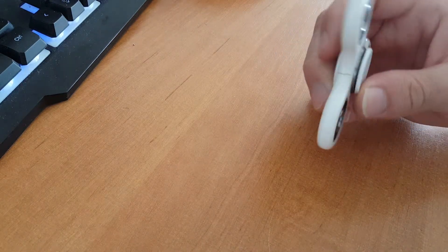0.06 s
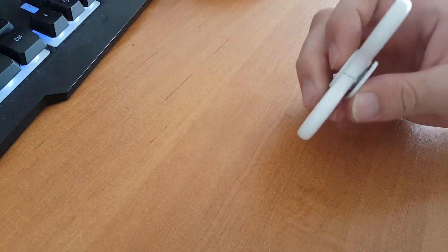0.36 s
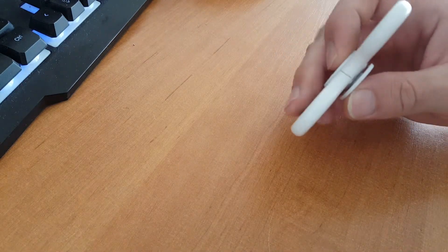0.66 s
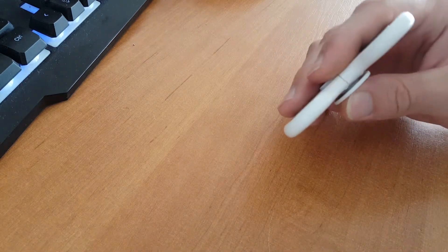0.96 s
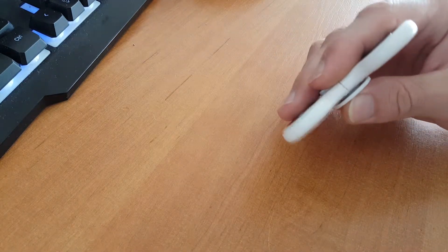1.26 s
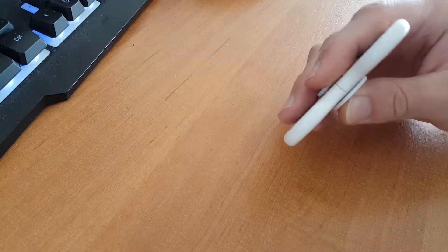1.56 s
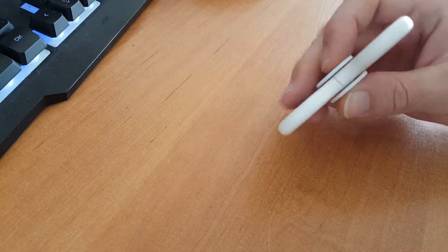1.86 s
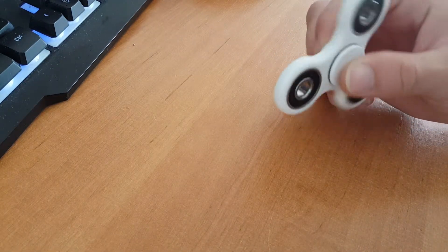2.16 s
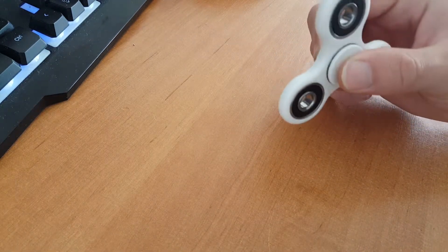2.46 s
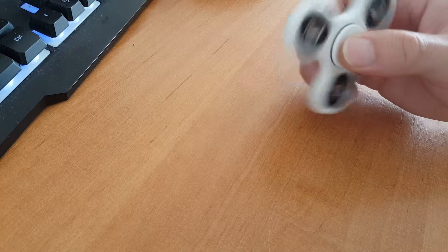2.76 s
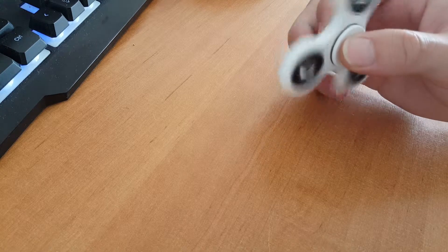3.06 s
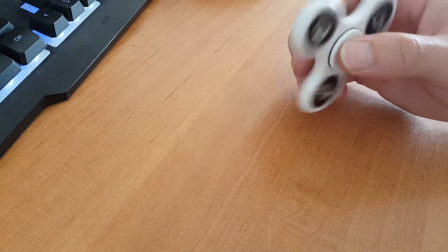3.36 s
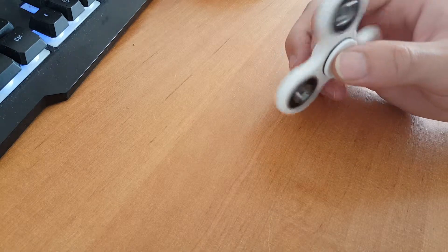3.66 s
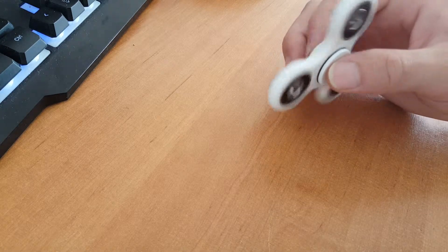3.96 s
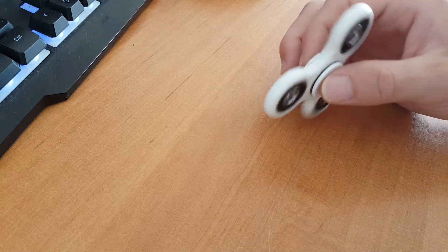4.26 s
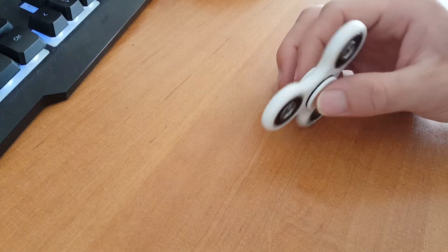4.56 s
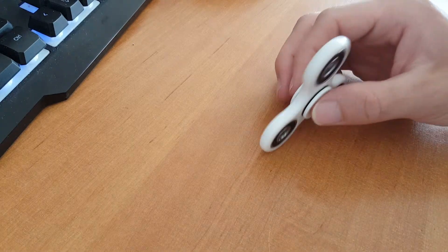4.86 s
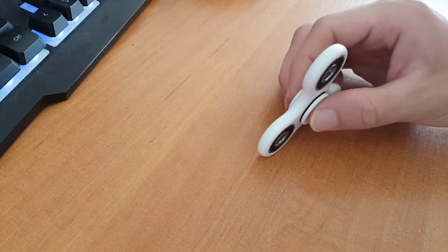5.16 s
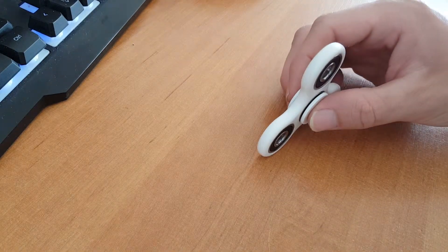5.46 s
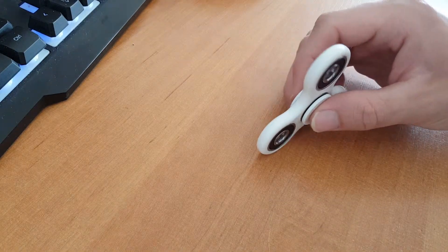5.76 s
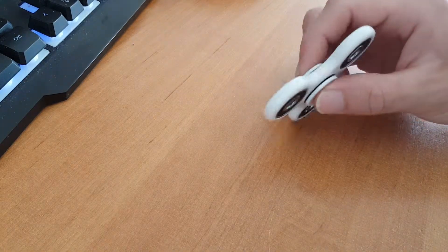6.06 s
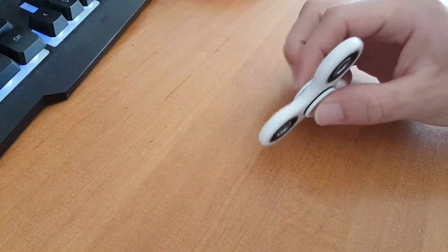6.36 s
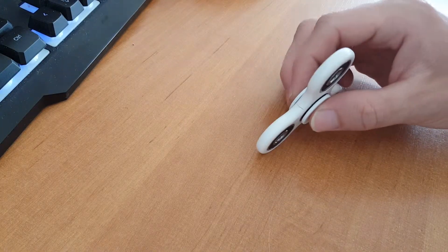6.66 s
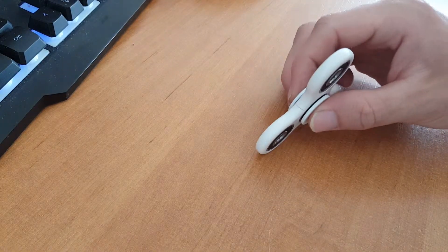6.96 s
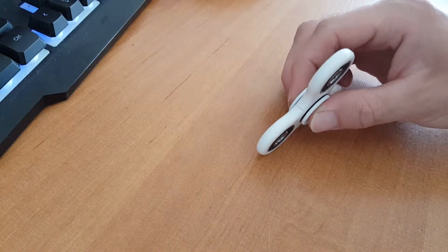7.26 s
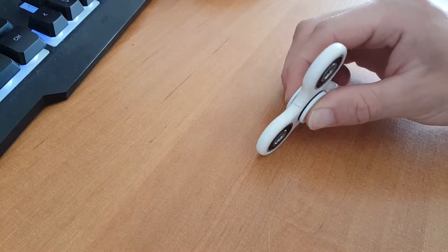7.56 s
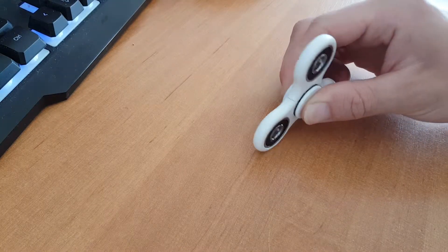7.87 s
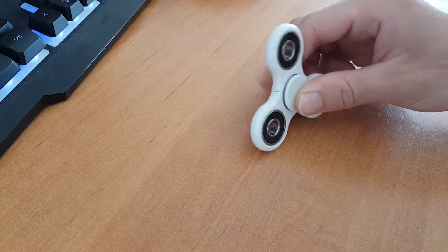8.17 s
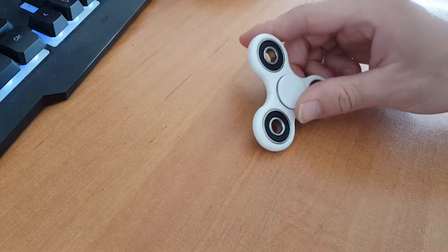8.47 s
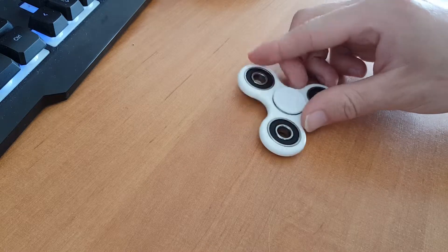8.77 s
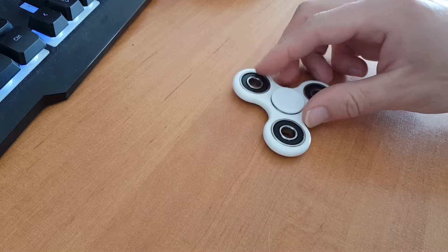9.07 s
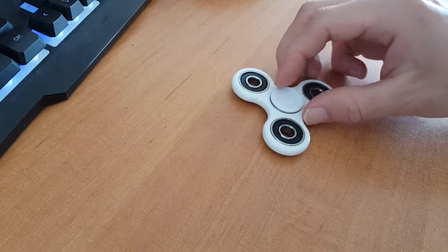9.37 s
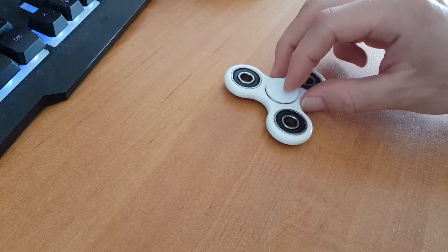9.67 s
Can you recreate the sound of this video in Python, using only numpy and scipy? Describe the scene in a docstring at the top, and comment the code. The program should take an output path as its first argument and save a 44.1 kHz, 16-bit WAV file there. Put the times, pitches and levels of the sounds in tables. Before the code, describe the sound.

A small plastic spinner clicks lightly in the hand, then knocks against a wooden desk with a slight rattle, close by.

```python
"""Fingernails tick on a plastic fidget spinner as it is turned in the hand, close by in a quiet, humming room.
It is then knocked and rolled on a wooden desk, and at last pushed along flat in short jerks.
Each impact excites the damped modes of the desk top and rattles the loose bearings in the shell.
Rolling and sliding are friction noise, coloured by the same two bodies; the room adds a diffuse echo."""
import sys
import numpy as np
from scipy import signal
from scipy.fft import rfft, irfft
from scipy.io import wavfile

SR = 44100
rng = np.random.default_rng(int(sys.argv[2]) if len(sys.argv) > 2 else 0)


def unload_wav(signal):
    """Save mono or channel-first audio to the path in sys.argv[1] as 16-bit WAV at rate SR, clipped to [-1, 1]."""
    wavfile.write(
        sys.argv[1],
        SR,
        np.round(np.clip(np.atleast_2d(signal).T, -1, 1) * 32767).astype(np.int16),
    )


N = 432621
TIME = np.arange(N) / SR

# Impacts on the desk: t/s, relative force/dB, contact cut-off/Hz, relative rattle/dB, bounce delay/s
IMPACTS = [(4.6460, -6, 1310, -21, 0.015), (4.9426, -3.5, 1370, -22, 0.02),
           (4.9953, -1.5, 1860, -14.5, 0.017), (5.797, -28, 950, -58, 0.0017),
           (5.814, -27.5, 1397, -46.5, 0), (5.82, -24, 160, -68, 0), (6.048, -17, 440, -54, 0.0004),
           (6.1748, -11.5, 890, -39.5, 0), (6.308, -31, 1100, -58, 0.00059),
           (6.4875, -5, 2020, -22.5, 0.00027), (6.5724, -5, 1681, -25.5, 0.018),
           (7.441, -49.5, 3494, -55, 0), (7.481, -47, 4507, -47, 0), (7.896, -43, 2700, -48.5, 0.0027),
           (8.1224, -32, 756, -62.5, 0), (8.5795, -20.5, 1996, -30, 0.012), (8.7809, -28, 2170, -37, 0),
           (8.7833, -7, 184.3, -34, 0.0017), (8.7899, -19, 396, -25, 0), (8.933, -36, 700, -50, 0.0019)]
# Nails and cap on the shell: t/s, relative level/dB, centre f/Hz, decay time/s
SHELL_TICKS = [(0.762, -34, 1850, .023), (1.022, -15.5, 6700, 0.0016), (1.335, -31.5, 9000, 0.0043),
               (1.337, -31.5, 3520, .006), (1.345, -31.5, 8500, .008), (1.365, -41, 9500, .0025),
               (2.026, -46.5, 6540, .002), (2.171, -39, 9500, 0.0027), (2.18, -37, 5200, .002),
               (2.648, -40.5, 7350, .0031), (2.744, -41, 5000, .005), (2.754, -36, 8200, 0.0053),
               (2.763, -31.5, 1930, 0.019), (3.566, -48, 7000, .0015), (3.915, -43, 8500, .004),
               (6.105, -42, 4100, .0017), (6.115, -41, 4100, 0.0036), (8.219, -46.5, 6100, .003),
               (9.652, -37, 7500, 0.0041)]
# Rim rolling over the wood grain: start t/s, duration/s, rumble level/dB, relative rasp/dB
RIM_ROLLS = [(5.794, 0.12, -44.5, -73), (5.916, 0.059, -36, -58.5), (5.985, 0.062, -34, -52.5),
             (6.205, .135, -41.5, -64), (8.11, 0.023, -44.5, -62), (8.237, 0.047, -40.5, -57.5),
             (8.419, .05, -57.5, -69), (8.68, .11, -55, -65)]
# Jerks of the flat spinner: t/s at top speed, scrape level/dB, desk shudder level/dB
SLIDE_JERKS = [(9.572, -56.5, -51.5), (9.668, -57.5, -57), (9.757, -71, -51), (9.805, -66, -54)]
# Modes of the desk top: f/Hz, T60/s, left level/dB, right level/dB
DESK_MODES = [(128, .42, -25, -25.5), (133.63, 0.6, -20.5, -21), (205.1, 0.19, -31, -36.5),
              (217.4, 0.33, -28.5, -31), (280, 0.14, -26.5, -21), (304.5, .45, -25.5, -25.5),
              (382.9, .15, -16.5, -13), (436.5, 0.082, -21.5, -21), (493.3, 0.12, -25, -17.5),
              (565.2, .06, -22, -14), (670, 0.0098, -24, -19), (799, 0.052, -24.5, -33),
              (885, 0.066, -20.5, -36.5), (1097, 0.1, -15.5, -32), (1151, 0.022, -13.5, -11.5),
              (1280, 0.031, -16.5, -16.5), (1360, 0.036, -17, -22.5), (1660, 0.0069, -19, -13),
              (1788, .04, -11.5, -22), (2322, 0.061, -19, -21.5), (2684, 0.009, -17.5, -16),
              (3340, .025, -24, -15)]
# Resonances of the shell and bearing rings: f/Hz, bandwidth/Hz, gain/dB
SHELL_MODES = [(3500, 800, -3.5), (5660, 1400, -4), (6740, 780, -2.5), (9400, 950, 1), (11300, 4900, -7),
               (14900, 2500, -9)]
# Spectrum of the reverberation: f/Hz, level/dB relative to the direct sound
REVERB_LEVELS = [(100, -17.5), (500, -12), (1000, -12), (2000, -11.5), (3800, -11.5), (7000, -17),
                 (14000, -17.5)]
# Reverberation time: f/Hz, T60/s
REVERB_TIMES = [(100, 0.93), (500, .4), (2000, 0.58), (6000, 0.28), (14000, 0.22)]
# Coherence of the room's sound field: f/Hz, left-right correlation
COHERENCE = [(60, 1), (130, 0.93), (290, 0.93), (640, -0.45), (1400, -0.15), (3100, 0)]
# Air noise of the room: f/Hz, relative spectral density/dB
AIR_SPECTRUM = [(12, -48.5), (20, -16), (65, -2.5), (91, -11), (123, 0.5), (150, -16), (193, -9),
                (248, -8.5), (337, -16.5), (446, -16.5), (542, -19.5), (759, -21), (6910, -43),
                (14700, -45.5), (16000, -38)]
# Hum of the room: f/Hz, bandwidth/Hz, rms level/dB
HUM_BANDS = [(123.84, 10, -65.5), (247, 22, -78), (438.8, 79, -75.5)]

TURN_START_S, TURN_END_S = 1.9, 4.5  # the fingers turn the toy in the air
RUB_HZ, RUB_WIDTH_HZ = 1160, 160  # the desk resonance that rubbing brings out


def knocks(desk):
    """Impact: a harder contact is shorter, hence brighter. The desk rings and clacks; the bearings buzz."""
    force, clack, rattle = np.zeros(N), np.zeros((2, N)), np.zeros((2, N))
    for s, db, contact_hz, rattle_db in impacts_and_bounces():
        pulse = butter(signal.unit_impulse(SR // 10), contact_hz, "low", order=3)
        flurry = butter(burst(decay_s=.0069, spread_db=1), contact_hz, "low", order=3)
        add(force, s, from_db(db) * pulse)
        add(clack, s, from_db(db + 22) * flurry)
        add(rattle, s, from_db(rattle_db + 15.5) * burst(decay_s=.0042, spread_db=5.5))
    clack = butter(butter(clack, 320, "high"), 3600, "low", order=3)
    return through(force, desk) + clack + shell(rattle)


def impacts_and_bounces(loss_db=8, softening=.82, min_delay_s=.003):
    """Inelastic rebound: a weaker, duller contact follows each impact whose delay exceeds the minimum."""
    for s, db, contact_hz, rattle_db, delay_s in IMPACTS:
        yield s, db, contact_hz, rattle_db
        if delay_s > min_delay_s:
            yield s + delay_s, db - loss_db, contact_hz * softening, rattle_db - loss_db


def desk_response(dip_db=-5, dip_hz=700, return_s=.001):
    """Modal superposition: the struck spot dips and springs back; edge reflections set up the modes."""
    t = TIME[:SR]
    response = -from_db(dip_db) * np.sin(2 * np.pi * dip_hz * t) * (t < 1 / dip_hz) * np.ones((2, 1))
    late = np.maximum(t - return_s, 0)
    for k, (hz, t60, left_db, right_db) in enumerate(DESK_MODES):
        mode = np.sin(2 * np.pi * hz * late) * np.exp(-np.log(1000) * late / t60)
        polarity = (-1) ** max(k - 1, 0)  # the lowest two start in step and beat; the others alternate
        response += polarity * from_db([[left_db], [right_db]]) * mode
    return butter(response, 95, "high")  # little sounds below the lowest modes


def shell(x):
    """Resonance: the plastic body and its steel rings filter each small contact in parallel."""
    return sum((-1) ** k * from_db(db) * resonate(x, hz, width)
               for k, (hz, width, db) in enumerate(SHELL_MODES))


def ticks(snap_s=.0016):
    """Impulse excitation: brief contacts ring the held shell; its damped body adds a clack and a thud."""
    bright, blunt = np.zeros((2, N)), np.zeros((2, N))
    for s, db, hz, decay_s in SHELL_TICKS + faint_ticks():
        clean = np.exp(-decay_s / snap_s)  # short contacts snap, longer ones scratch
        snap = np.sqrt(clean) * signal.unit_impulse(SR // 10)
        scratch = (1 - clean) * burst(decay_s, spread_db=4)
        contact = from_db(db + 18) * (snap + scratch)
        add(bright, s, resonate(contact, hz, .37 * hz))
        add(blunt, s, contact)
    clack = from_db(-5.5) * butter(bright, 4200, "low", order=3)
    thud = from_db(-15) * butter(butter(blunt, 2400, "low", order=1), 400, "high")
    return (shell(bright) + clack + thud) * from_db([[-1], [1]])  # slightly to the right


def faint_ticks(per_s=6, db=-54, spread_db=2, hz=8500, decay_s=.0022):
    """Poisson process: nails graze the shell at independent moments while the toy turns."""
    times = TIME[(rng.random(N) < per_s / SR) & (TIME > TURN_START_S) & (TIME < TURN_END_S)]
    return [(s, db + spread_db * rng.standard_normal(), hz * rng.uniform(.6, 1.33), decay_s)
            for s in times]


def roll(desk):
    """Roughness excitation: wood grain jolts the rolling rim into the desk; where it slips, it rasps."""
    starts, durations, rumble_db, rasp_db = np.transpose(RIM_ROLLS)
    pressure = np.array([roll_pressure(s, duration) for s, duration in zip(starts, durations)])
    rumble, rasp = from_db(rumble_db) @ pressure, from_db(rasp_db) @ pressure
    coarse = butter(butter(grains(N, spread_db=7), 480, "low", order=3), 380, "high", order=4)
    fine = butter(butter(grains(N, spread_db=4), 1600, "high"), 3000, "low")
    force = rumble * coarse / np.std(through(coarse, desk))
    force += from_db(-3) * rasp * fine / np.std(through(fine, desk))
    friction = grains((2, N), spread_db=8.5)
    slip = butter(butter(friction, 1000, "high"), 2500, "low", order=3)
    slip += from_db(8) * resonate(friction, RUB_HZ, RUB_WIDTH_HZ)
    slip += from_db(-8.5) * resonate(friction, 3350, 400) + from_db(-21) * shell(friction)
    return through(force, desk) + rms_one(slip) * rasp


def roll_pressure(start_s, duration_s, attack_s=.004, release_s=.014, growth_db=4.5):
    """Contact load: it sets in quickly, grows as the hand leans in, then relaxes exponentially."""
    t = np.maximum(TIME - start_s, 0)
    attack = 1 - np.exp(-t / attack_s)
    growth = from_db(growth_db * (np.minimum(t / duration_s, 1) - 1))
    release = np.exp(-np.maximum(t - duration_s, 0) / release_s)
    return attack * growth * release


def slide():
    """Sliding friction: the flat spinner hisses over the varnish and shakes the desk's lowest mode."""
    scraping = sum(from_db(db) * swell(s, width_s=.028) for s, db, _ in SLIDE_JERKS)
    shaking = sum(from_db(db) * swell(s, width_s=.037) for s, _, db in SLIDE_JERKS)
    friction = grains((2, N), spread_db=8.5)
    hiss = butter(butter(friction, 770, "high"), 1900, "low", order=1)
    hiss += resonate(friction, 8960, 700)  # one thin singing band
    hiss += from_db(6) * resonate(friction, RUB_HZ, RUB_WIDTH_HZ) + from_db(-21) * shell(friction)
    shudder = resonate(resonate(rng.standard_normal(N), 126, 18), 125, 20)
    return rms_one(hiss) * scraping + rms_one(shudder) * shaking


def skin_rustle(turn_db=-90, fade_s=.1, regrip_s=2.19, regrip_db=-72):
    """Stick-slip friction: skin catches on the plastic in faint clumps, most as the grip shifts."""
    turning = np.clip(np.minimum(TIME - TURN_START_S, TURN_END_S - TIME) / fade_s, 0, 1)
    level = from_db(turn_db) * turning + from_db(regrip_db) * swell(regrip_s, width_s=.06)
    flutter = rms_one(butter(rng.standard_normal(N), 40, "low"))
    clumps = from_db(9.4 * np.clip(flutter, -2, 2))
    friction = grains((2, N), spread_db=6) * clumps
    return rms_one(shell(friction) + from_db(-9) * resonate(friction, 2950, 3000)) * level


def room_response(rise_s=.0083):
    """Diffuse reverberation: each half octave builds up, then decays exponentially at its own rate."""
    t, response = TIME[:SR], 0
    edges_hz = 70 * 2 ** (np.arange(17) / 2)
    for low, high in zip(edges_hz, edges_hz[1:]):
        hz = np.sqrt(low * high)
        bandpass = signal.butter(2, [low, high], "band", fs=SR, output="sos")
        band = partly_coherent(signal.sosfilt(bandpass, rng.standard_normal((2, SR))), hz)
        envelope = np.exp(-np.log(1000) * t / at_hz(REVERB_TIMES, hz)) * (1 - np.exp(-t / rise_s))
        unity_gain = np.sqrt(2 * (high - low)) / SR  # matches a unit impulse's energy in this band
        response += from_db(at_hz(REVERB_LEVELS, hz)) * rms_one(band * envelope) * unity_gain
    return response


def room_noise(air_db=-58):
    """Stationary noise: a dull broad spectrum of air, with narrow bands that are heard as hum."""
    hz = np.fft.rfftfreq(N, 1 / SR)
    spectra = rfft(rng.standard_normal((2, N))) * from_db(at_hz(AIR_SPECTRUM, hz))
    air = rms_one(irfft(partly_coherent(spectra, hz), N))
    hum = sum(from_db(db) * rms_one(resonate(resonate(rng.standard_normal(N), f, width), f, width))
              for f, width, db in HUM_BANDS)
    return from_db(air_db) * air + hum


def partly_coherent(pair, hz):
    """Coherence: the weighted sum and difference of two independent noises give left and right."""
    mid, side = pair
    correlation = np.clip(at_hz(COHERENCE, hz), -1, 1)
    return np.sqrt(1 + correlation) * mid + np.sqrt(1 - correlation) * side * [[1], [-1]]


def grains(shape, spread_db):
    """Micro-contacts: unit-power noise whose strength varies log-normally from sample to sample."""
    noise = rng.standard_normal(shape)
    return rms_one(noise * from_db(spread_db * np.clip(rng.standard_normal(shape), -2, 2)))


def burst(decay_s, spread_db):
    """Exponential decay of micro-contacts, independent and of unit energy in each channel."""
    t = TIME[:SR // 10]
    flurry = grains((2, len(t)), spread_db) * np.exp(-t / decay_s)
    return flurry / np.sqrt(np.sum(flurry ** 2, axis=1, keepdims=True))


def swell(s, width_s):
    """Gaussian envelope around time s, down to 1/e at width_s either side."""
    return np.exp(-((TIME - s) / width_s) ** 2)


def resonate(x, hz, width_hz):
    """Damped second-order resonator with unit peak gain."""
    r = np.exp(-np.pi * width_hz / SR)
    feedback = [1, -2 * r * np.cos(2 * np.pi * hz / SR), r * r]
    return signal.lfilter(np.array([1, 0, -1]) * (1 - r * r) / 2, feedback, x + 1e-18)


def butter(x, hz, kind, order=2):
    """Causal, maximally flat low- or high-pass."""
    return signal.sosfilt(signal.butter(order, hz, kind, fs=SR, output="sos"), x + 1e-18)


def through(x, response):
    """Convolution with a stereo impulse response."""
    return signal.oaconvolve(np.atleast_2d(x), response, axes=1)[:, :N]


def add(track, s, sound):
    """Superposition of a short sound at time s."""
    start = round(s * SR)
    track[..., start:start + sound.shape[-1]] += sound[..., :N - start]


def at_hz(points, hz):
    """Interpolation along log frequency."""
    known_hz, values = np.transpose(points)
    return np.interp(np.log(np.maximum(hz, 1)), np.log(known_hz), values)


def from_db(db):
    """Amplitude ratio of a level in decibels."""
    return 10 ** (np.asarray(db) / 20)


def rms_one(x):
    """Normalisation to unit power."""
    return x / np.sqrt(np.mean(x ** 2) + 1e-20)


def scene():
    """Superposition of the direct sound, its reverberation and the room's own noise."""
    desk = desk_response()
    direct = knocks(desk) + ticks() + skin_rustle() + roll(desk) + slide()
    return direct + through(direct, room_response()) + room_noise()


def record(dry):
    """Band limiting: a steep elliptic low-pass removes the treble above 16 kHz."""
    return signal.sosfilt(signal.ellip(10, .1, 80, 16000, fs=SR, output="sos"), dry)


dry = scene()
out = record(dry)
unload_wav(out)
```